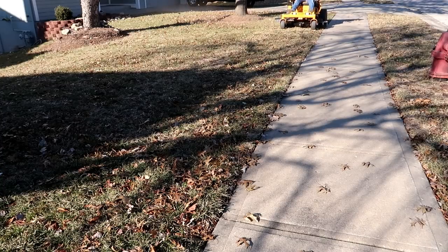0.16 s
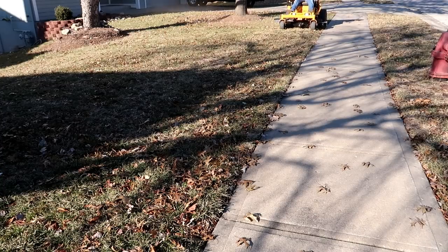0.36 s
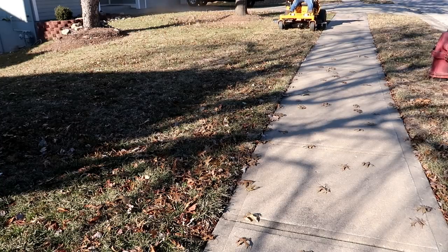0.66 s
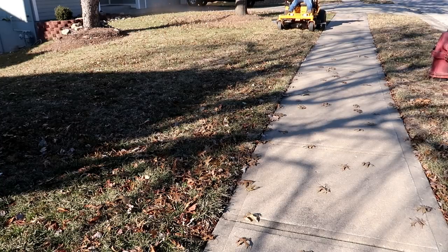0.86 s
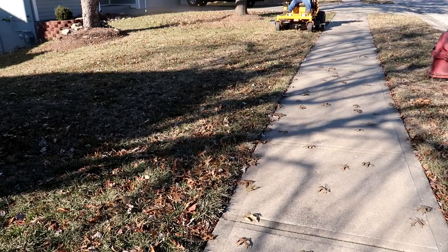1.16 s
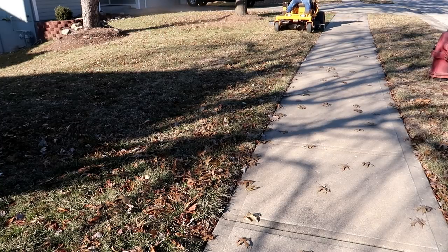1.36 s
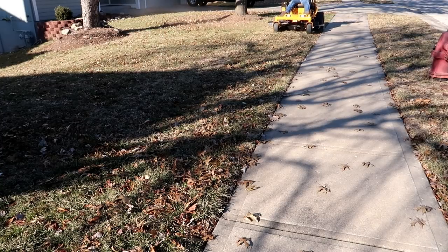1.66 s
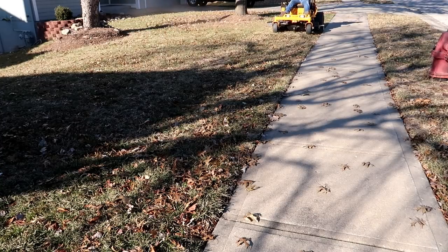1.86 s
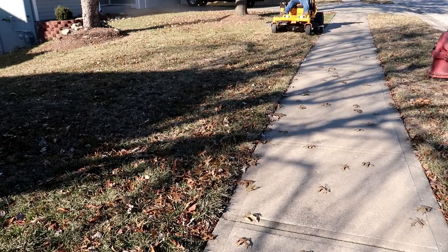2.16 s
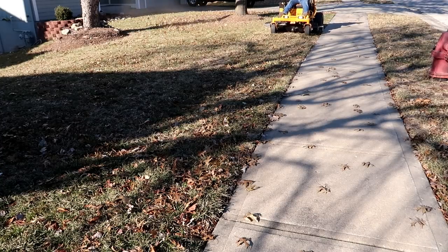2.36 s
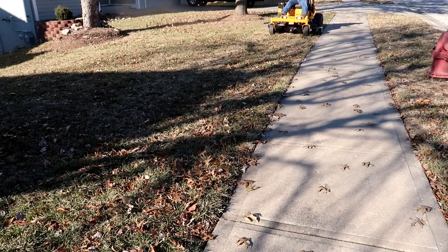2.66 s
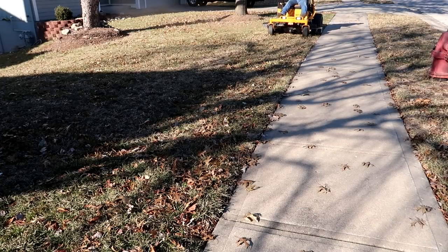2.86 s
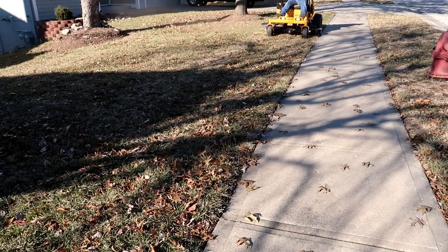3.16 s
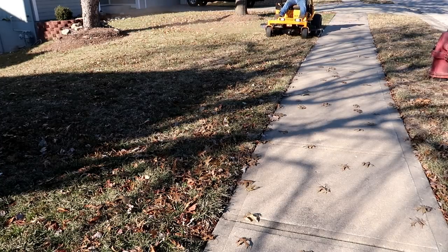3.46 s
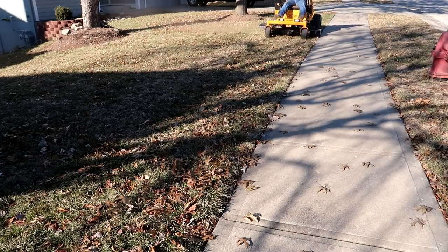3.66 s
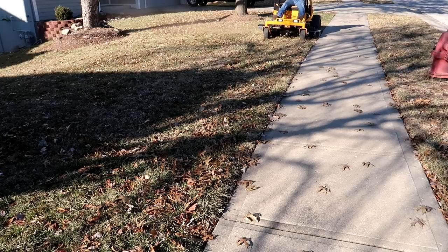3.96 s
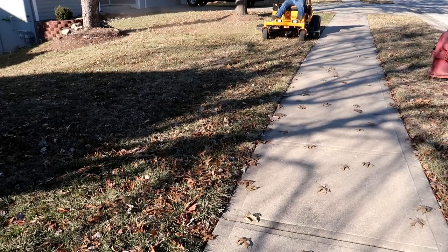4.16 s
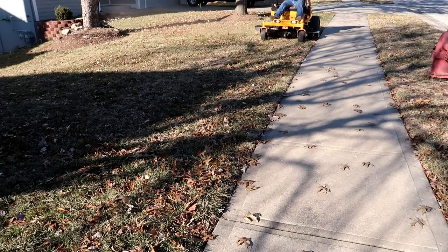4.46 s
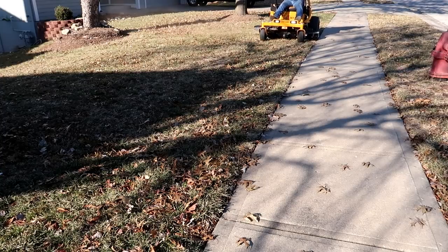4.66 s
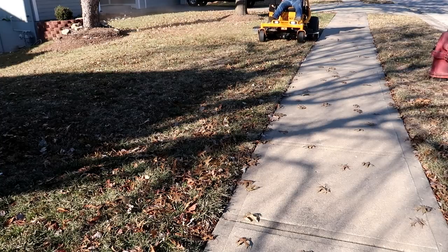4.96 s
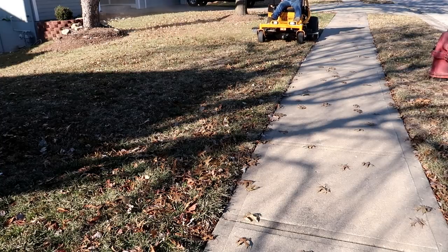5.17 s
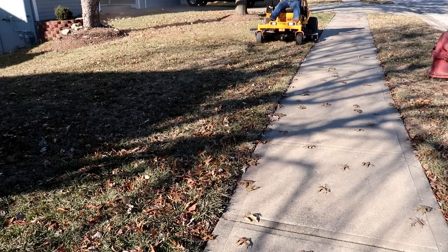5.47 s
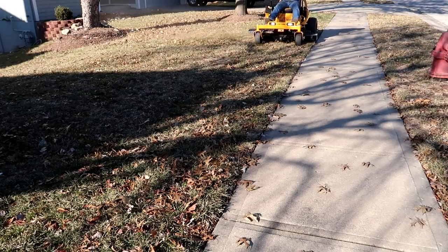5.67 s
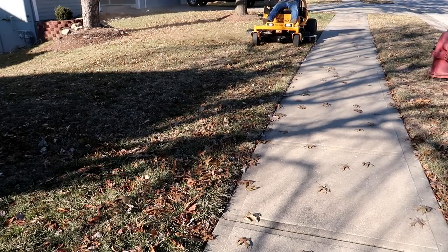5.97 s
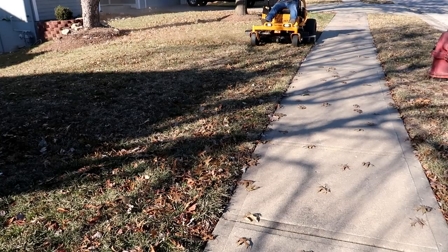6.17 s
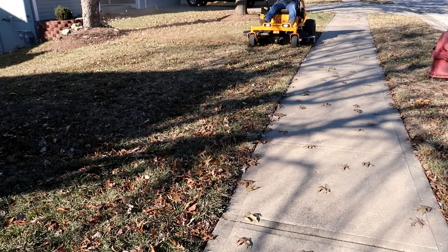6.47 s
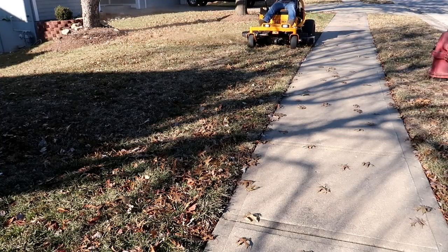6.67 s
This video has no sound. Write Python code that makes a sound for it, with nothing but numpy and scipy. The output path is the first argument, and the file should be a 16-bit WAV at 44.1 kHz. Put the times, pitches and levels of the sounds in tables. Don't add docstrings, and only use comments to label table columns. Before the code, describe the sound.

A steady, heavy mower hum around a low bass pitch wavers slowly, with engine thud beneath and rough rushing air above. Leaf fragments rustle, stalks snap and small debris knocks on steel throughout, strongest in a burst just before the end. The mower comes gradually closer over open lawn, slightly right of centre, captured by a small hand-held microphone with automatic gain; the highest treble opens slightly.

```python
import sys
import numpy as np
from scipy import signal
from scipy.fft import rfft, irfft, next_fast_len
from scipy.io import wavfile
from scipy.ndimage import uniform_filter1d

SR = 44100
rng = np.random.default_rng(int(sys.argv[2]) if len(sys.argv) > 2 else 0)


def voltage_ratio(decibels):
    exponent = np.asarray(decibels, float) / 20
    return 10 ** exponent


def unload_wav(signal):
    wavfile.write(
        sys.argv[1],
        SR,
        np.round(np.clip(np.atleast_2d(signal).T, -1, 1) * 32767).astype(np.int16),
    )


N = 301193
TIME = np.arange(N) / SR
SIZE = next_fast_len(N + SR // 2)

# start_s, rate_hz
BLADE_RATE = [
    (0, 128.4),
    (5.2, 128.45),
    (5.7, 127.7),
    (6.2, 128.4),
    (6.83, 128.5),
]
BEATING_MULTIPLES = (1, 2, 3, 4, 6)
# first_level_db, second_share, second_in_step_s, third_share, third_in_step_s
SPINDLES = [(-16, 0.4, 3.78, 0.25, 2.73), (-28, 1.22, 4.24, 0.89, 3.424), (-31, 1.39, 3.68, 0.65, 3.522),
            (-43, 3.06, 2.797, 1.3, 3.134), (-47.5, 2.2, 3.109, 1.1, 3.52)]
# start_s, second_hz, third_hz
BELT_SLIP = [(0.0, 0.491, 0.168), (0.85, 0.161, 0.262), (1.71, 0.197, 0.529), (2.56, 0.34, 0.523),
             (3.42, 0.076, 0.307), (4.27, 0.306, 0.584), (5.12, 0.256, 0.349), (5.98, 0.241, 0.513),
             (6.83, 0.267, 0.438)]
# multiple, level_db
UPPER_BLADE_PARTIALS = [(5, -39.5), (7, -42), (8, -48.5), (9, -50.5), (10, -49), (11, -58)]
# start_s, rate_hz
CRANK_RATE = [
    (0, 53.55),
    (4.5, 53.5),
    (5.6, 53.2),
    (6.3, 53.5),
    (6.83, 53.5),
]
# crank_multiple, level_db
ENGINE_ORDERS = [(.5, -25), (1, -0.5), (1.5, -17), (2, -5.5), (3, -2), (3.5, -9.5), (4, 0), (4.5, -7),
                 (5.5, -23), (6, -7), (7, -3)]
# frequency_hz, density_db (dB per Hz)
AIR_COLOUR = [(25, -21), (60, -16), (100, -2.5), (170, -0.5), (350, 1), (600, -2.5), (1000, -11),
              (1600, -18.5), (2600, -22), (4000, -25), (6000, -29), (8600, -32.5), (11200, -44.5),
              (15000, -53)]
# start_s, gain_db, load_db
GAIN_AND_LOAD = [(0, -1.5, 2), (.4, -1.7, 0.2), (.8, 0, -.3), (1.2, 1.2, -0.3), (1.55, 3.5, 1),
                 (1.87, 3.5, -0.2), (2.0, 0.9, 0.1), (2.5, -0.6, 0.9), (2.95, -0.6, 0.6),
                 (3.25, -1.8, -0.5), (3.9, 1.2, -0.4), (4.4, -0.9, 1), (4.7, -2, -.7), (5.2, -0.15, -0.9),
                 (5.6, -0.2, -1.3), (6.0, 3.1, -1.5), (6.35, -0.25, -0.2), (6.83, 0.8, -1.5)]
# start_s, peak_db, treble_db
STRIKES = [(0.369, -26, -4.5), (0.6249, -20.5, -4), (1.017, -25, -5), (1.3794, -18.5, -8),
           (1.5263, -20, -3), (1.544, -12.5, -15), (2.017, -19, -12), (2.4233, -16.5, -7),
           (2.6275, -23, -4), (3.0918, -22, -9), (3.4745, -14.5, -12), (3.676, -24, -6), (4.0184, -14, -15),
           (4.0785, -20.5, -7), (4.1858, -20, -13), (4.312, -21.5, -4), (5.013, -21.5, -4),
           (5.8254, -20, -13), (6.415, -21, -10), (6.4591, -20, -9), (6.703, -9, -10), (6.7185, -13.5, -9),
           (6.74, -14, -16), (6.7614, -25, -5)]
# start_s, peak_db, centre_hz
STALK_TICKS = [(0.5271, -22, 6080), (0.5486, -18, 4090), (0.819, -21, 4180), (1.3507, -22, 4040),
               (1.447, -23, 4620), (1.6364, -22, 4030), (1.7139, -25, 4160), (1.8212, -17.5, 7260),
               (2.3051, -24, 6090), (2.4068, -22, 4630), (2.8694, -36, 4810), (3.042, -16.5, 4220),
               (3.463, -23, 8000), (3.9044, -18, 4140), (3.9987, -21, 6680), (4.1598, -24, 4580),
               (4.4906, -27, 7000), (4.5494, -24, 7000), (4.6582, -20, 6500), (4.8578, -24, 7000),
               (5.0388, -19, 5110), (5.1504, -27, 3000), (5.204, -24, 7070), (5.4525, -25, 5960),
               (5.5397, -20, 4020), (5.665, -24, 7950), (6.1379, -23, 6000), (6.301, -21, 7500),
               (6.6332, -20, 5140), (6.6434, -25, 6170)]
# start_s, peak_db, pitch_hz, t60_s
STEEL_RINGS = [(.626, -37, 4630, .1), (1.262, -27, 4600, .07), (1.381, -31, 3950, .08),
               (1.386, -33, 4600, .12), (1.547, -27, 1850, 0.11), (2.02, -27, 1950, 0.081),
               (3.478, -28.5, 2010, .1), (3.69, -36, 3460, .15), (4.02, -29, 2990, .08),
               (4.021, -25, 6600, .06), (4.11, -36, 3480, .15), (6.7042, -17, 3400, 0.061),
               (6.7075, -22, 3650, .04), (6.7045, -21, 4500, .045), (6.7048, -20, 5300, .045)]
# frequency_hz, density_db (dB per Hz)
DIFFUSE_COLOUR = [(60, -20), (250, -4), (900, -4), (1700, -9), (2600, -9), (4600, -10), (7000, -13),
                  (8100, -16), (9000, -22), (10000, -21), (10800, -19), (12000, -21), (13500, -23.5),
                  (15000, -31)]
# frequency_hz, left_minus_right_db
PORT_LEVEL = [(60, 0), (130, -.25), (260, -.45), (400, -1), (900, -2.1), (1300, -1.9), (2100, -.9),
              (2600, -1.4), (4600, -1.5), (5400, -.9), (7000, -.7), (9000, 0), (11200, -.7), (14800, 0)]
# frequency_hz, left_lead_rad
PORT_PHASE = [(130, 0), (400, .07), (600, 0), (2100, -.13), (3200, -.36), (4600, -.58), (5400, -.4),
              (7000, -.5), (8000, -.1), (9000, -.03), (10000, -.2), (11200, -1.4), (13000, -2.4),
              (14800, -3)]

BELT_HZ, BELT_SHARE, BELT_S = 6.4, 0.055, 3.03
THROB_HZ, THROB_SHARE, THROB_S = 5.264, 0.18, 3.078
ENGINE_DB = -37.5
LOPE_HZ, LOPE_DB, LOPE_S, LOPE_FADE_S = 1.92, 2, 0.16, 5
RATTLE_S, RATTLE_S_PER_DB = 0.14, -0.003
NEARING_DB_PER_S, AIR_LOSS_HZ = 2.5, 12800


def curve(table):
    s, *columns = np.transpose(table)
    return [np.interp(TIME, s, column) for column in columns]


def on_log(table, hz):
    table_hz, values = np.transpose(table)
    return np.interp(np.log(np.maximum(hz, 1)), np.log(table_hz), values)


def level(x, db):
    return x * voltage_ratio(db) / np.sqrt(np.mean(x ** 2))


def band(x, lo_hz, hi_hz):
    edges = [lo_hz, min(hi_hz, 0.45 * SR)]
    return signal.sosfilt(signal.butter(2, edges, "band", fs=SR, output="sos"), x)


def walk(rate):
    hold = int(SR / rate)
    steps = np.repeat(rng.standard_normal(N // hold + 1), hold)
    return 1.3 * uniform_filter1d(uniform_filter1d(steps, hold), hold)[:N]


def turn(hz, start_s):
    return np.exp(2j * np.pi * hz * (TIME - start_s))


def decay(t, t60):
    return np.exp(-np.log(1000) * t / t60)


def tone(phase, multiple, db, wobble):
    start = 2 * np.pi * rng.random()
    return np.sqrt(2) * voltage_ratio(db) * np.cos(multiple * phase + start + wobble * walk(9))


def beat_db(multiple, db, share_2, start_2, share_3, start_3, extra):
    total = 1 + extra
    for hz, share, start in zip(curve(BELT_SLIP), (share_2, share_3), (start_2, start_3)):
        turns = np.cumsum(hz) / SR
        turns_since_step = turns - np.interp(start, TIME, turns)
        total = total + share * np.exp(2j * np.pi * multiple * turns_since_step)
    return db + 20 * np.log10(np.abs(total) + 0.018)


def blades(phase, gain_db):
    belt = np.cos(2 * np.pi * BELT_HZ * TIME)
    throb = THROB_SHARE * turn(THROB_HZ, THROB_S) + BELT_SHARE * turn(BELT_HZ, BELT_S)
    db = beat_db(1, *SPINDLES[0], throb) + gain_db + 0.69 * walk(11)
    out = tone(phase, 1, db, wobble=0.043)
    for multiple, row in zip(BEATING_MULTIPLES[1:], SPINDLES[1:]):
        db = beat_db(multiple, *row, 0) + gain_db + 1.05 * walk(14)
        out += tone(phase + 0.082 * belt, multiple, db, wobble=0.21)
    for multiple, db in UPPER_BLADE_PARTIALS:
        db = db + 0.66 * gain_db + 3.6 * walk(4.08)
        out += tone(phase + 0.07 * belt, round(multiple), db, wobble=0.84)
    return out


def engine(gain_db):
    phase = 2 * np.pi * np.cumsum(curve(CRANK_RATE)[0]) / SR
    lope_db = LOPE_DB * turn(LOPE_HZ, LOPE_S).real * np.exp(-TIME / LOPE_FADE_S)
    engine_db = ENGINE_DB + 1.2 * gain_db + lope_db
    out = np.zeros(N)
    for multiple, order_db in ENGINE_ORDERS:
        db = engine_db + order_db + 1.4 * walk(6) * (multiple > 1)
        out += tone(phase, round(2 * multiple) / 2, db, wobble=0.14)
    return out


def air(phase, roar_db, hiss_db):
    hz = np.fft.rfftfreq(SIZE, 1 / SR)
    chop = np.cos(phase + 2.0 + 0.16 * walk(16))
    crumb_size = voltage_ratio(4.4 * np.minimum(rng.exponential(size=N), 3.5))
    crumbs = crumb_size * (rng.random(N) < 90 / SR)
    crumbs = signal.lfilter([1], [1, -np.exp(-1 / (0.0039 * SR))], crumbs)
    rustle = (1 + 0.16 * crumbs) * voltage_ratio(0.54 * walk(12))
    colour = rfft(rng.standard_normal(SIZE)) * voltage_ratio(on_log(AIR_COLOUR, hz))
    out = np.zeros(N)
    for centre in 20 * 2 ** np.arange(0, 10.5, 1.0):
        octaves_off = np.log2(np.maximum(hz, 1) / centre)
        share = np.cos(np.pi / 2 * np.clip(octaves_off, -1, 1))
        high = np.clip(np.log2(centre / 550.0) / 2.7, 0, 1)
        gain_db = (1 - high) * roar_db + high * hiss_db + 0.45 * walk(8)
        gain = voltage_ratio(gain_db) * rustle ** high
        gain *= voltage_ratio(0.5 * TIME * (centre > 9000))
        out += irfft(colour * share ** 2, SIZE)[:N] * gain * (1 + (0.15 - 0.061 * high) * chop)
    return level(out, -22.5)


def add_at(out, s, sound):
    i = int(s * SR)
    out[i:i + len(sound)] += sound


def debris_strikes():
    out, t = np.zeros(N + SR), np.arange(SR // 4) / SR
    for s, db, treble_db in STRIKES:
        t60 = RATTLE_S + RATTLE_S_PER_DB * (db + 19)
        noise = rng.standard_normal(len(t))
        fragments = voltage_ratio(rng.standard_normal(len(t) // 128 + 1))
        rattle = decay(t, np.clip(t60, 0.01, 0.6)) * np.repeat(fragments, 128)[:len(t)]
        crack = 0.25 * np.exp(-t / 0.0017)
        push = noise * (rattle + crack) * np.minimum(t / 0.00072, 1)
        hit = band(push, 1260, 5260)
        hit += voltage_ratio(treble_db) * band(push, 4370, 7600)
        hit += voltage_ratio(-28) * band(push, 9400, 13000)
        add_at(out, s, level(hit, db - 24.0) * np.sqrt(t60 / 0.16))
    return out[:N]


def stalk_ticks():
    out, t = np.zeros(N + SR), np.arange(512) / SR
    for s, db, hz in STALK_TICKS:
        burst = rng.standard_normal(len(t)) * np.exp(-t / 0.0034)
        add_at(out, s, level(band(burst, 0.47 * hz, 1.75 * hz), db - 20.0))
    return out[:N]


def steel_rings():
    out, t = np.zeros(N + SR), np.arange(SR // 4) / SR
    for s, db, hz, t60 in STEEL_RINGS:
        ring = voltage_ratio(db) * np.sin(2 * np.pi * hz * t) * decay(t, t60)
        add_at(out, s, ring * np.minimum(t / 0.0024, 1))
    return out[:N]


def scattered(hiss_db):
    hz = np.fft.rfftfreq(SIZE, 1 / SR)
    spectrum = rfft(rng.standard_normal((2, SIZE))) * voltage_ratio(on_log(DIFFUSE_COLOUR, hz))
    noise = level(irfft(spectrum, SIZE)[:, :N], -43)
    return noise * voltage_ratio(hiss_db + 0.11 * TIME + 1.1 * walk(20))


def two_ports(mower):
    hz = np.fft.rfftfreq(SIZE, 1 / SR)
    half = voltage_ratio(on_log(PORT_LEVEL, hz) / 2) * np.exp(0.5j * on_log(PORT_PHASE, hz))
    lead = SR // 4
    spectrum = rfft(np.pad(mower, (lead, SIZE - N - lead), "reflect", reflect_type="odd"))
    return np.array([irfft(side, SIZE)[lead:lead + N] for side in (spectrum * half, spectrum / half)])


def nearing(x):
    high_pass = signal.butter(4, AIR_LOSS_HZ, "high", fs=SR, output="sos")
    top = signal.sosfiltfilt(high_pass, x)
    return x + top * (voltage_ratio(NEARING_DB_PER_S * (TIME - 5)) - 1)


def scene():
    phase = 2 * np.pi * np.cumsum(curve(BLADE_RATE)[0]) / SR
    gain_db, load_db = curve(GAIN_AND_LOAD)
    roar_db = gain_db + 0.8 * walk(18)
    hiss_db = gain_db + load_db + 0.5 * walk(18)
    mower = blades(phase, gain_db) + engine(gain_db) + air(phase, roar_db, hiss_db)
    mower += debris_strikes() + stalk_ticks() + steel_rings()
    return nearing(two_ports(mower) + scattered(hiss_db))


def roll_off(x):
    return signal.sosfilt(signal.butter(12, 15030, fs=SR, output="sos"), x)


def record(dry):
    rounded = np.tanh(0.63 * dry) / 0.58
    fade = np.minimum((N / SR - TIME) * SR / 128, 1)
    return roll_off(rounded * fade)


dry = scene()
out = record(dry)
unload_wav(out)
```